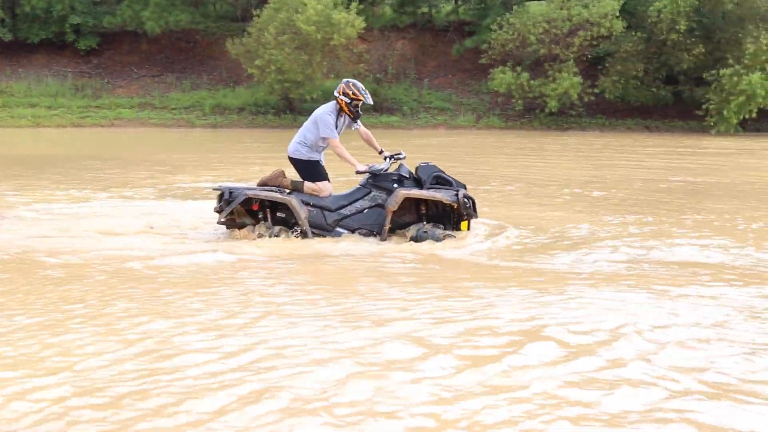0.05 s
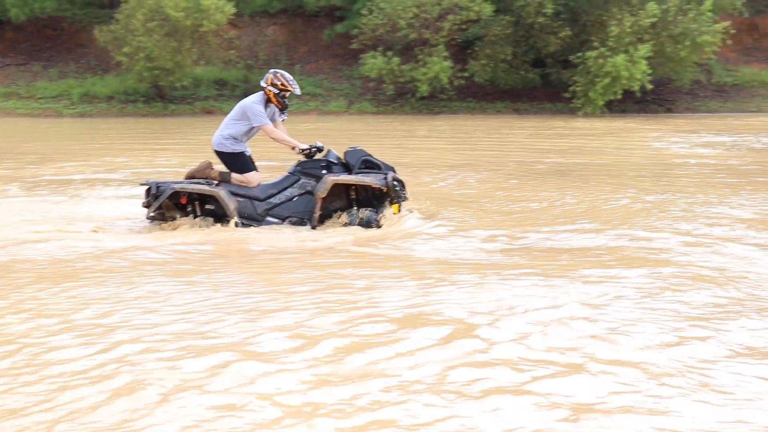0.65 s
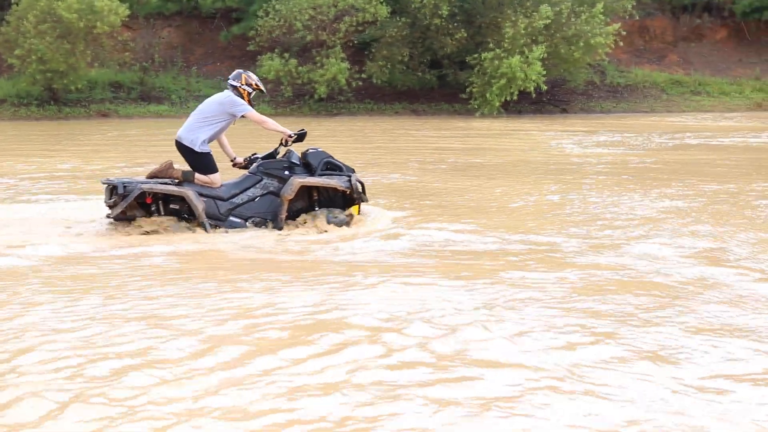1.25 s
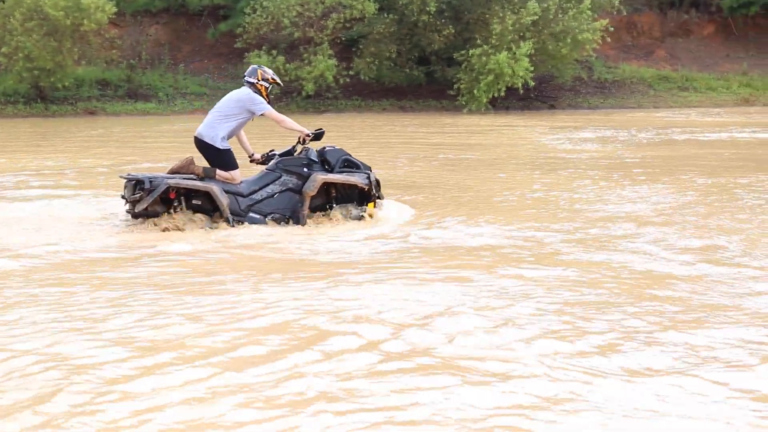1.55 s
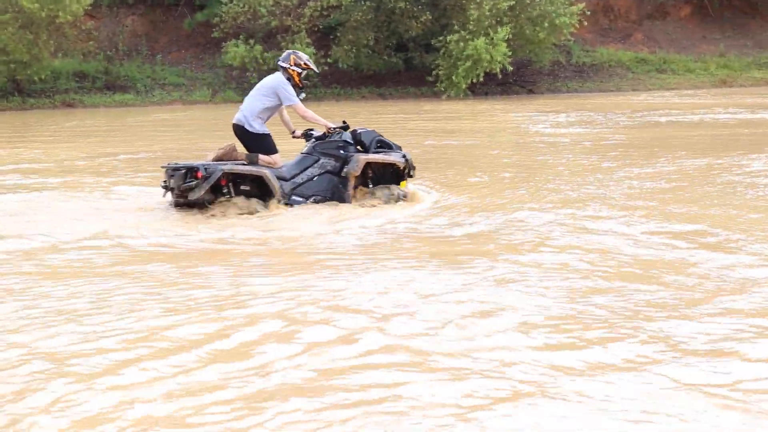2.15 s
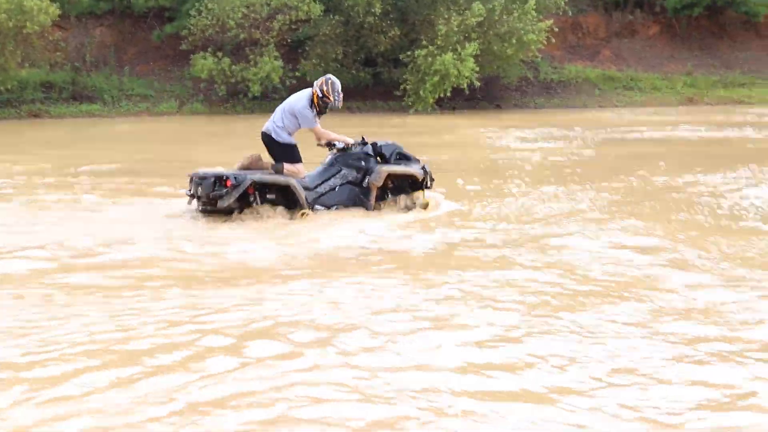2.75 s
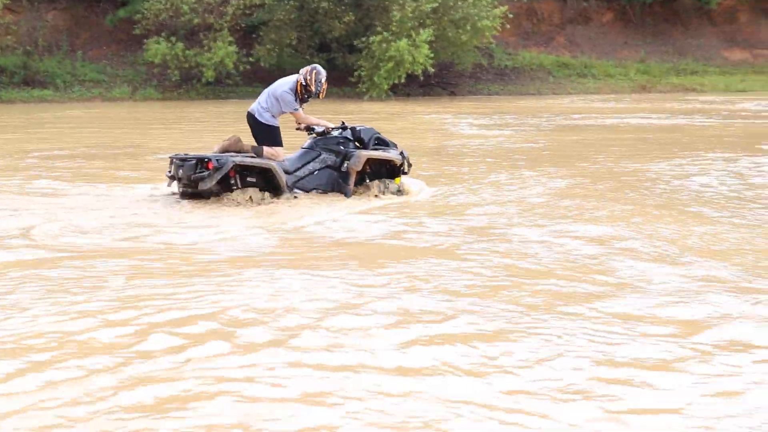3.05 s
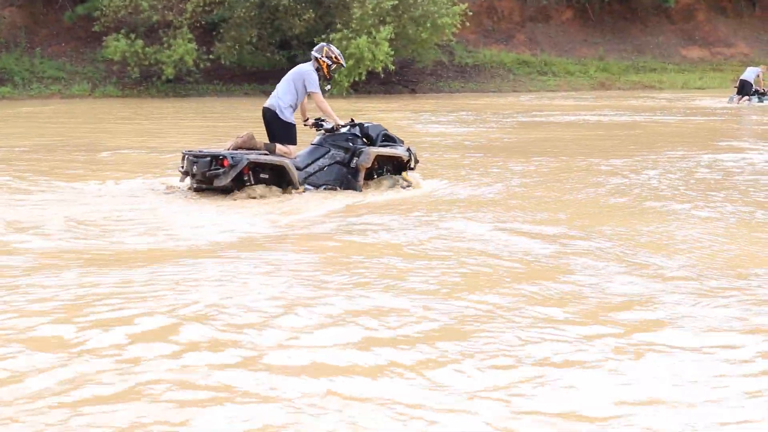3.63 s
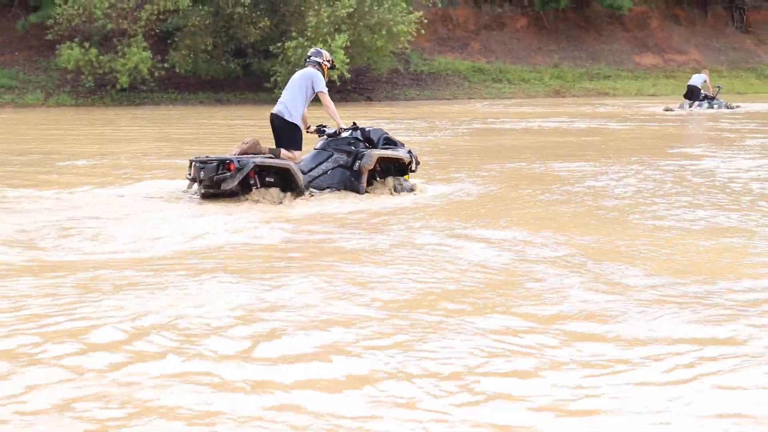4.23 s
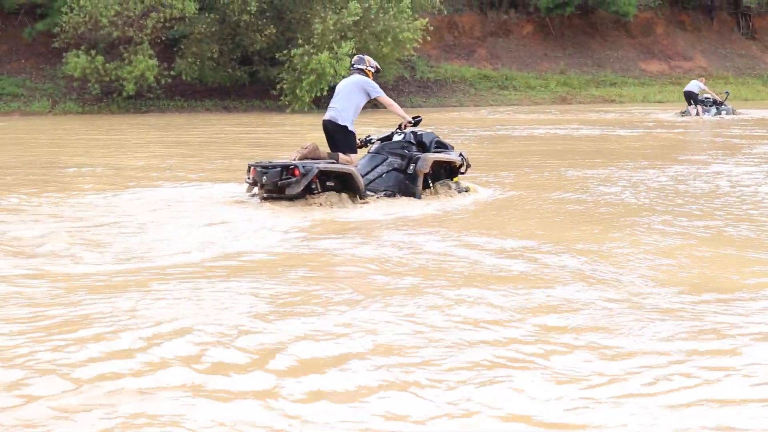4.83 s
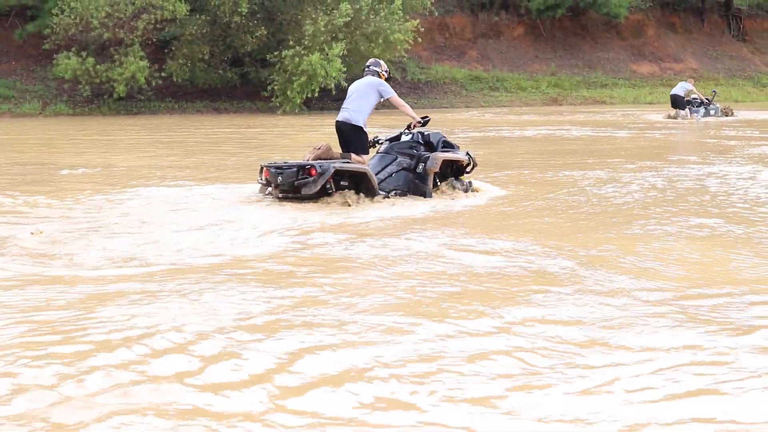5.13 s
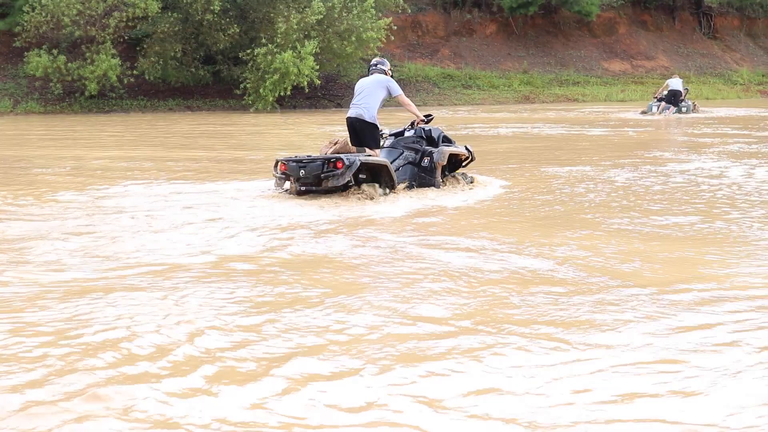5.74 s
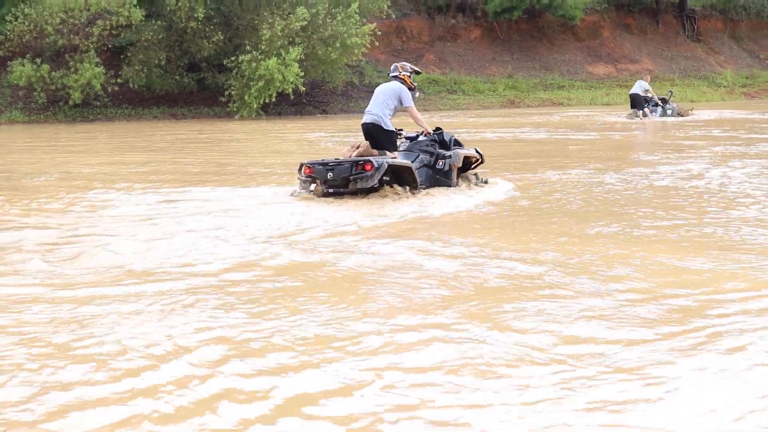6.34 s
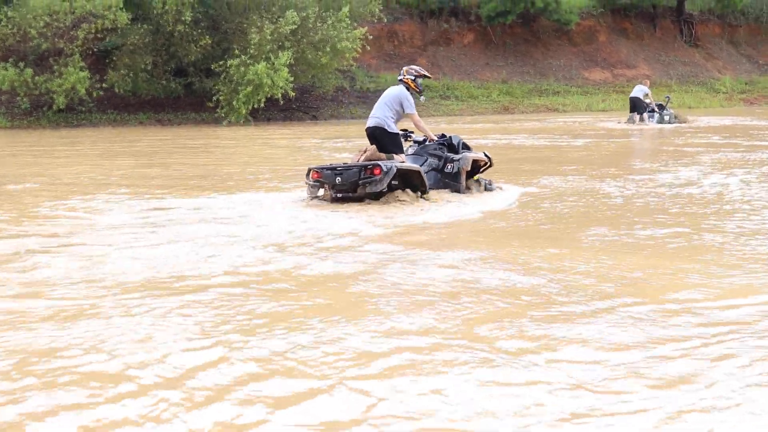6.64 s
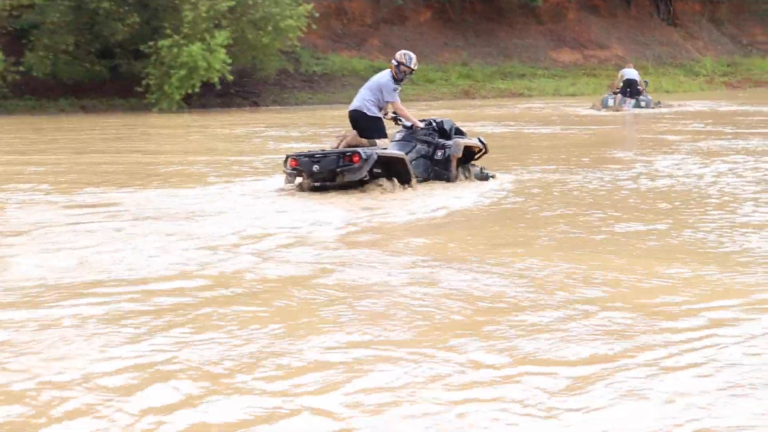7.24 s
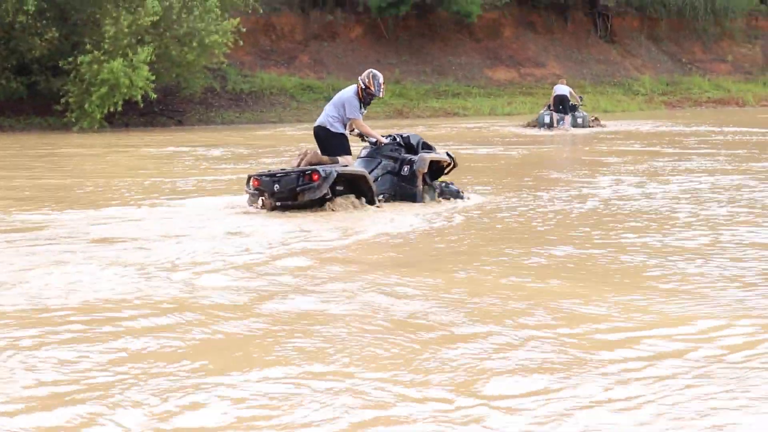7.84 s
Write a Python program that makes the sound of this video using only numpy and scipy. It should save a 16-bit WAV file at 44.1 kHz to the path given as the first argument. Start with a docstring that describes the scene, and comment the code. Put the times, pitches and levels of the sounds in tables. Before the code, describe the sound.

A quad bike wades through churning water, its engine slowing to a lumpy idle and speeding up again, while another drones far off.

```python
"""A quad bike wades through a muddy pond, slowing to a lumpy idle and then speeding up again.
Its two cylinders fire unevenly: each firing thumps in the silencer, and the gas growls in the tailpipe.
Its drive squeaks when wet and whines at idle. A second quad drones steadily across the water.
The wheels churn up a rumble, a bubbling wash, spray and a few sharp splashes;
in the first second, big pockets of air glug under them."""
import sys
import numpy as np
from scipy import signal
from scipy.fft import rfft, irfft
from scipy.io import wavfile
from scipy.ndimage import uniform_filter1d

SR = 44100
rng = np.random.default_rng(int(sys.argv[2]) if len(sys.argv) > 2 else 0)


def waveform_to_disk(signal):
    """Save audio, clipped to [-1, 1], as 16-bit WAV at the path in sys.argv[1]."""
    frames = np.transpose(np.atleast_2d(signal))
    scaled = np.clip(frames, -1, 1) * 32767
    samples = np.round(scaled).astype(np.int16)
    wavfile.write(sys.argv[1], SR, samples)


N = 347508
TIME = np.arange(N) / SR
FREQS = np.maximum(np.arange(N // 2 + 1) * SR / N, 1)
CUTOFF_HZ = 15750

# tone of the gas rasping out of either quad's tailpipe: f/Hz, relative level/dB
RASP_TONE = [(500, -5), (750, -3), (1000, -5.5), (1300, 4.5), (2000, -18), (3200, -11), (5000, -21.5),
             (9000, -19.5), (12500, -21.5), (15500, -49)]


def from_db(db):
    """Turn decibels into a number to multiply by."""
    return 10 ** (np.asarray(db) / 20)


def rms_one(x):
    """Scale a signal so that its average power is 1."""
    return x / np.sqrt(np.mean(x ** 2) + 1e-20)


def even(x, size=11025):
    """Even out slow changes in loudness but keep the single beats."""
    return x / np.sqrt(uniform_filter1d(uniform_filter1d(x ** 2, size), size // 2) + 1e-20)


def in_time(rows):
    """Join a table's points in time with straight lines, one curve for each column of values."""
    times, *columns = np.transpose(rows)
    return [np.interp(TIME, times, column) for column in columns]


def at_hz(points, hz):
    """Read between a table's frequencies, giving every octave the same room."""
    points = np.array(points)
    return np.interp(np.log(hz), np.log(points[:, 0]), points[:, 1])


def bumps(rows, width_s):
    """A smooth rise and fall around each listed moment."""
    return sum(height * np.exp(-((TIME - s) / width_s) ** 2) for s, height in rows)


def white():
    """Two unrelated streams of plain hiss."""
    return rng.standard_normal((2, N))


def drift(rate_hz):
    """A smooth random wobble, about 1 in size."""
    r = np.exp(-200 * np.pi * rate_hz / SR)
    noise = rng.standard_normal(N // 100 + 1002)   # one value for every 100 samples
    slow = signal.lfilter([1], [1, -2 * r, r * r], noise)[1000:]
    return np.interp(np.arange(N) / 100, np.arange(len(slow)), rms_one(slow))


def grains(per_s, spread_db):
    """Two streams of random clicks of uneven size."""
    sizes = from_db(spread_db * np.minimum(rng.exponential(1, (2, N)), 5))
    return rms_one(sizes * np.sign(white()) * (rng.random((2, N)) < per_s / SR))


def low_pass(x, hz, order=2):
    """Soften everything above the given frequency."""
    return signal.sosfilt(signal.butter(order, hz, fs=SR, output="sos"), x)


def resonate(x, modes):
    """Let a sound ring at each listed pitch, and add up the rings with every second one flipped."""
    out = 0
    for k, (hz, width, db) in enumerate(modes):
        r = np.exp(-np.pi * width / SR)
        poles = [1, -2 * r * np.cos(2 * np.pi * hz / SR), r * r]
        ring = signal.lfilter([1, 0, -1], poles, x + 1e-18)
        out = out + (-1) ** k * from_db(db) * (1 - r * r) / 2 * ring
    return out


def diffuse(pair, tone):
    """Give two unrelated noises a tone and spread them between the left and right microphones."""
    # how alike the two sides are: f/Hz, likeness (held within 0-1 below)
    likeness = [(60, 0), (190, 4.5), (350, 0.78), (700, 0.57), (1400, 0.39), (2800, 0.18), (5600, 0.38),
                (11000, 0.24), (14000, 0.2)]
    # how much louder the left side is: f/Hz, left minus right/dB
    balance = [(100, 4.5), (350, 1), (700, -1.7), (1500, -1.5), (2200, -5.5), (5600, -2.5), (7500, -.5),
               (10500, -1), (12500, -5), (15000, -3)]
    mid, side = rfft(pair) * from_db(at_hz(tone, FREQS))
    alike = np.clip(at_hz(likeness, FREQS), 0, 1)
    sign = np.array([[1], [-1]])
    ears = np.sqrt(1 + alike) * mid + sign * np.sqrt(1 - alike) * side
    out = irfft(ears * from_db(sign * at_hz(balance, FREQS) / 2), N)
    return out / np.std(out.mean(axis=0))


def late_on_left(x, lag_s):
    """Let the left microphone hear a sound a little later than the right one."""
    return np.array([np.interp(TIME - lag_s, TIME, x), x])


def rumble():
    """The wheels heave the water about with a dull rumble."""
    # loudness of the stirred pond: t/s, level/dB
    loudness = [(0, -25), (.5, -52), (1, -41.5), (3.0, -25.5), (4.0, -32.5), (5.2, -32), (7.88, -27.5)]
    # its deep tone: f/Hz, relative level/dB
    tone = [(22, -48), (45, 6), (90, -6.5), (180, 8.5), (300, -5.5), (600, -6), (1000, -38.5)]
    return from_db(in_time(loudness)[0]) * diffuse(white(), tone)


def bubbles(per_s, purity, low_hz, high_hz, sizes=20):
    """Each bubble rings briefly at the pitch of its size; more purity means a longer ring."""
    clicks = grains(per_s, spread_db=3.5)
    size = rng.integers(0, sizes, N)
    pitches = np.geomspace(low_hz, high_hz, sizes)
    rings = (resonate(clicks * (size == k), [(hz, hz / purity, 0)]) for k, hz in enumerate(pitches))
    return rms_one(sum(rings))


def water():
    """The wheels stir a bubbling wash and throw off a spray of fine drops, both in uneven gushes."""
    # loudness of the churned water: t/s, wash/dB, spray/dB
    loudness = [(0, -31.5, -43), (.32, -31, -36.5), (.85, -29.5, -38), (1.1, -30, -39.5),
                (1.7, -28.5, -38.5), (2.15, -30.5, -39), (2.45, -30.5, -38), (2.95, -28, -38),
                (3.3, -31.5, -39), (4.1, -32, -38.5), (5.3, -32, -38.5), (6.1, -31.5, -45.5),
                (6.5, -33, -43), (7.88, -33, -41.5)]
    # tone of the sloshing wash: f/Hz, relative level/dB
    wash_tone = [(350, 3.5), (650, 5.5), (1000, -3.5), (1350, -1), (2000, -6), (3000, -15), (4000, -20),
                 (5000, -32), (7000, -36)]
    # tone of the hissing spray: f/Hz, relative level/dB
    spray_tone = [(3000, 12), (4800, 1), (6000, 4.5), (6800, 3), (8000, 5), (10500, 3.5), (12500, 0),
                  (14000, -3), (15500, -13)]
    wash_db, spray_db = in_time(loudness)
    gush = drift(28)
    churn = white() + from_db(-13) * bubbles(per_s=1100, purity=18, low_hz=800, high_hz=4200)
    drips = from_db(-9) * bubbles(per_s=1600, purity=40, low_hz=3500, high_hz=13000)
    drops = white() + .3 * grains(per_s=3500, spread_db=3) + drips
    wash = diffuse(churn, wash_tone) * from_db(wash_db + 1.16 * gush)
    spray = diffuse(drops, spray_tone) * from_db(spray_db + 1.18 * gush)
    return wash + spray


def splashes():
    """Water slaps back on the pond or spits from the tailpipe in short bursts, each with its own tone."""
    # slaps and spits: t/s, peak level/dB, fade time/s, middle f/Hz
    slaps = [(.224, -20, .002, 1800), (.358, -21, .005, 1300), (1.970, -18.5, .003, 700),
             (3.123, -34, .02, 3000), (4.358, -25, .022, 3500), (4.632, -34, .02, 2200),
             (4.982, -29, .008, 2500), (5.254, -26.5, .004, 3600), (5.300, -17, .003, 2500),
             (6.273, -32, .005, 6000), (6.601, -23, .002, 1500), (6.689, -34, .01, 5500),
             (7.610, -19.5, .003, 1500), (7.657, -41, .008, 11000)]
    # tone of the noise they are all cut from: f/Hz, relative level/dB
    tone = [(700, 28), (1400, 5.5), (3200, 8.5), (5000, -4), (9000, -1), (13000, -2), (15500, -28)]
    rise = 0.47   # as a share of the fade time
    noise, out = diffuse(white(), tone), np.zeros((2, N))
    for s, db, fade_s, hz in slaps:
        start = int(s * SR)
        band = signal.butter(1, [hz / 1.6, min(hz * 1.6, CUTOFF_HZ)], "band", fs=SR, output="sos")
        burst = rms_one(signal.sosfilt(band, noise[:, start:start + SR // 4]))
        length = burst.shape[1]
        age = TIME[:length] / fade_s
        envelope = np.minimum(age / rise, np.exp(rise - age))
        out[:, start:start + length] += from_db(db) * envelope * burst
    return out


def glugs(ring_cycles, rise_per_s):
    """Big pockets of air under the wheels ring for a few swings each, rising in pitch."""
    # air pockets: t/s, starting level/dB, starting f/Hz
    pockets = [(0.019, -9.5, 254), (.172, -13, 222), (0.407, -7.5, 197), (.498, -7.5, 206),
               (.572, -28, 292), (.635, -18, 404), (0.653, -9, 296), (.705, -13, 420), (.827, -21, 203)]
    out, t = np.zeros(N), TIME[:SR // 8]
    for s, db, hz in pockets:
        start = int(s * SR)
        ring = np.sin(2 * np.pi * hz * t * (1 + rise_per_s * t / 2))
        out[start:start + len(t)] += from_db(db) * np.exp(-t * hz / ring_cycles) * ring
    return out


def distant_quad():
    """A second quad drones in tones that waver on their way over the water, and rasps once a cycle."""
    # engine speed: t/s, engine cycles per second/Hz
    engine_speed = [(0, 23.3), (.5, 22.3), (.92, 22.3), (1.18, 24.2), (1.8, 24.25), (2.3, 24.6),
                    (2.7, 24.4), (3.55, 24.15), (3.8, 22.2), (4.05, 22.0), (4.28, 22.85), (4.55, 21.65),
                    (4.95, 21.45), (5.2, 22.3), (5.55, 21.2), (6.15, 22.3), (6.6, 21.9), (6.92, 22.3),
                    (7.88, 21.6)]
    # loudness and dullness: t/s, level/dB, treble loss/dB per octave
    loudness = [(0, 1, 1), (.8, 1, -2.5), (1.6, 1.5, 4.5), (3.2, -0.5, -4.5), (5.2, 2, -6), (5.7, 1.5, 1),
                (7.88, -3.5, 18.5)]
    # the tones of the drone: multiple of the engine speed, relative level/dB
    tones = [(2, -43), (4, -34), (5, -30), (6, -32), (7, -34.5), (8, -30.5), (9, -29), (10, -38.5),
             (11, -38), (12, -40), (13, -35.5), (14, -43.5), (15, -44.5), (18, -45), (25, -45.5), (26, -55)]
    # its pipe lifts tones that pass these pitches: f/Hz, width/Hz, gain/dB
    pipe = [(121, 8.8, -1), (268.7, 8.9, -2), (320.8, 15, -5.5), (570, 12, -3.5)]
    cycles = np.cumsum(in_time(engine_speed)[0]) / SR
    level_db, loss_db = in_time(loudness)
    mean_hz = cycles[-1] / TIME[-1]
    drone = 0
    for multiple, db in tones:
        phase = 2 * np.pi * (multiple * cycles + rng.random()) + .15 * drift(4)
        octaves = max(np.log2(multiple * mean_hz / 295), 0)   # the treble loss starts at 295 Hz
        tone_db = db - loss_db * octaves + 2.42 * drift(4.8)
        drone = drone + np.sqrt(2) * from_db(tone_db) * np.sin(phase)
    drone = drone + sum(resonate(drone, [mode]) for mode in pipe)
    since_firing = (cycles - .75) % 1
    rasp = diffuse(np.exp(-since_firing / 0.27) * white(), RASP_TONE)
    return from_db(level_db) * (late_on_left(drone, lag_s=0.000093) + from_db(-45.5) * rasp)


def whines(wander_hz, waver_db):
    """The wading quad's drive sings thinly while the engine idles."""
    # one curve for each whine, with points of: t/s, f/Hz, level/dB
    curves = [
        [(1.3, 537, -56), (1.6, 540.6, -38), (2.2, 538, -35), (3.1, 523, -44), (3.55, 518, -45),
         (3.8, 515, -53)],
        [(1.6, 835, -56), (1.8, 837, -42), (2.35, 856, -55), (2.6, 845, -43.5), (3.55, 830, -41),
         (3.7, 846, -57)],
    ]
    out = 0
    for curve in curves:
        hz, db = in_time(curve)
        sounding = (TIME > curve[0][0]) & (TIME < curve[-1][0])
        envelope = sounding * np.sqrt(2) * from_db(db + waver_db * drift(9.9))
        pitch_hz = hz + wander_hz * drift(13)
        out = out + envelope * np.sin(2 * np.pi * np.cumsum(pitch_hz) / SR)
    return out


def squeaks(hz, width_s):
    """A wet part of the drive sings briefly, always near the same pitch."""
    # short metallic squeaks: t/s, peak level/dB
    moments = [(.185, -32), (.358, -21.5), (.61, -29), (0.681, -27), (.81, -28), (.878, -25), (1.21, -30),
               (6.83, -30), (7.68, -33)]
    envelope = bumps([(s, from_db(db)) for s, db in moments], width_s)
    pitch_hz = hz + 30 * drift(123)
    return late_on_left(envelope * np.sin(2 * np.pi * np.cumsum(pitch_hz) / SR), lag_s=0.00017)


def firings(speed_hz, jitter_s, spread_db):
    """One click each time a cylinder fires, always a little off in time and strength."""
    # the two unevenly spaced cylinders: place in the engine cycle (0-1), strength/dB
    cylinders = [(.438, 0), (.82, -1.2)]
    cycles = np.cumsum(speed_hz) / SR
    clicks = np.zeros(N)
    for place, db in cylinders:
        due_s = np.interp(np.arange(place, cycles[-1], 1), cycles, TIME)
        late, strong = rng.standard_normal((256, 2))[:len(due_s)].T
        at = np.clip(((due_s + jitter_s * late) * SR).astype(int), 0, N - 1)
        clicks[at] = from_db(db + spread_db[at] * strong)
    return clicks


def puffs(clicks, fade_s):
    """A gust of gas dies away after each click."""
    return rms_one(signal.lfilter([1], [1, -np.exp(-1 / (fade_s * SR))], clicks + 1e-18))


def thumps(clicks, filling_db):
    """Firings ring the pipe and silencer, whose deep chamber booms when slow and eats bass when fast."""
    # two linked silencer chambers make each thump swell before it dies: f/Hz, width/Hz, gain/dB
    silencer = [(98, 51.6, 12.5), (112.6, 27.4, 14)]
    # ring of the pipe leaving the engine: f/Hz, width/Hz, gain/dB
    front_pipe = [(191, 83.6, -2.5)]
    # the deep chamber, filled by slow, long pushes of gas: f/Hz, width/Hz, gain/dB
    deep_chamber = [(63, 22, -5)]
    swallowed = .8
    soft = low_pass(clicks, hz=270, order=1)
    sharp = signal.sosfilt(signal.butter(2, 70, "high", fs=SR, output="sos"), soft)
    deep = resonate(soft * (from_db(filling_db) - swallowed), deep_chamber)
    return even(resonate(sharp, silencer) - resonate(sharp, front_pipe) - deep)


def wading_quad():
    """Thumps merge into a hum at speed; the gas growls and barks in the tailpipe and rasps at its end."""
    # engine speed: t/s, engine cycles per second/Hz
    engine_speed = [(0.0, 23.484), (0.25, 22.974), (0.45, 21.946), (0.64, 22.764), (0.74, 18.843),
                    (0.86, 19.31), (0.95, 17.169), (1.1, 17.025), (1.6, 15.408), (1.85, 12.349),
                    (2.0, 12.227), (2.2, 12.686), (2.55, 12.424), (2.9, 11.789), (3.1, 11.825),
                    (3.3, 12.379), (3.45, 12.68), (3.7, 14.195), (4.0, 15.407), (4.15, 14.878),
                    (4.55, 12.248), (4.85, 12.267), (5.05, 11.428), (5.2, 13.42), (5.41, 21.209),
                    (5.6, 21.115), (5.8, 21.053), (6.0, 22.557), (6.17, 22.99), (6.3, 21.962),
                    (6.55, 21.87), (6.8, 23.22), (6.95, 23.102), (7.15, 21.994), (7.4, 22.726),
                    (7.88, 21.224)]
    # how it runs at each speed: engine speed/Hz, deep chamber filling/dB, unevenness of firings/dB
    running = [(12, 4, 2), (15, 7, 1.7), (17, 7, 1.5), (21, -22, .7), (23, -25, .7)]
    # loudness of the exhaust's low and middle parts: t/s, boom/dB, growl/dB
    loudness = [(.15, -26, -28.5), (.35, -16.5, -25), (.68, -20.5, -23.5), (.93, -16.5, -27),
                (1.15, -16.5, -33.5), (1.4, -17.5, -31), (1.6, -16.5, -35), (2.0, -16, -32),
                (2.3, -17.5, -37), (2.9, -17, -32.5), (3.15, -14.5, -34), (3.4, -17, -36),
                (3.85, -16, -33.5), (4.1, -18, -39), (4.7, -15, -33.5), (5.1, -16.5, -30), (5.42, -13, -32),
                (5.8, -14.5, -34.5), (6.5, -12.5, -33), (7.15, -14, -37), (7.88, -12.5, -36)]
    # the boom dips briefly: t/s, depth/dB
    dips = [(.15, 3), (.45, 4), (.78, 7), (5.95, 1.5), (6.17, 4.5), (6.78, 2.5), (6.95, 3), (7.1, 2),
            (7.3, 3)]
    # the bark and rasp swell for a moment: t/s, rise/dB
    swells = [(2.9, 4.5), (5.25, 4), (6.05, 5), (6.85, 5.5), (7.25, 0.5), (7.62, 4.5)]
    # the tailpipe's low rings: f/Hz, width/Hz, gain/dB
    growl_rings = [(249, 75, -6.5), (327.5, 41, 3), (348, 50.5, 4), (403, 97, -1.5)]
    # the tailpipe's high rings: f/Hz, width/Hz, gain/dB
    bark_rings = [(533, 58, 1.5), (627, 73, 0), (725, 41, -1), (838.5, 15.4, -1)]
    speed_hz, = in_time(engine_speed)
    boom_db, growl_db = in_time(loudness)
    # the bark and rasp also follow the growl's loudness a little
    swing_db = 0.17 * (growl_db - growl_db.mean()) + bumps(swells, width_s=0.15)
    speeds, *by_speed = np.transpose(running)
    filling_db, uneven_db = (np.interp(speed_hz, speeds, column) for column in by_speed)
    clicks = firings(speed_hz, jitter_s=0.00018, spread_db=uneven_db)
    boom = thumps(clicks, filling_db) * from_db(boom_db - bumps(dips, width_s=0.037))
    gas = puffs(clicks, fade_s=.02)
    blast = .8 * rms_one(clicks) + .6 * gas * white()
    growl = even(low_pass(resonate(blast[0], growl_rings), hz=596)) * from_db(growl_db)
    hissy_blast = blast[1] + 0.96 * gas * white()[0]
    bark = even(low_pass(resonate(hissy_blast, bark_rings), hz=1020)) * from_db(-37.5 + swing_db)
    # each firing spits with a strength of its own
    spits = puffs(clicks * from_db(2.8 * drift(25)), fade_s=.012)
    rasp = diffuse(spits * white(), RASP_TONE) * from_db(-45.5 + swing_db)
    return (boom + growl + bark) * from_db([[-.3], [.3]]) + rasp   # a touch louder on the right


def scene():
    """Both quads and the water, added together in stereo."""
    quads = wading_quad() + squeaks(hz=1715, width_s=0.011) + distant_quad()
    quads += whines(wander_hz=4, waver_db=3)
    return quads + water() + glugs(ring_cycles=1.9, rise_per_s=4.1) + splashes() + rumble()


def record(dry):
    """The very highest treble is cut off steeply."""
    return irfft(rfft(dry) / np.sqrt(1 + (FREQS / CUTOFF_HZ) ** 400), N)


dry = scene()
out = record(dry)
waveform_to_disk(out)
```